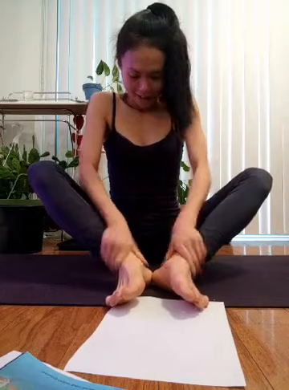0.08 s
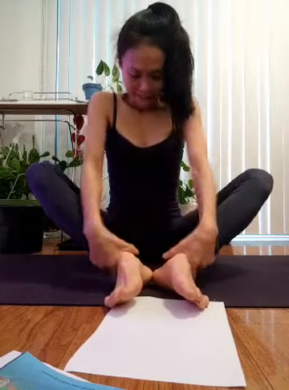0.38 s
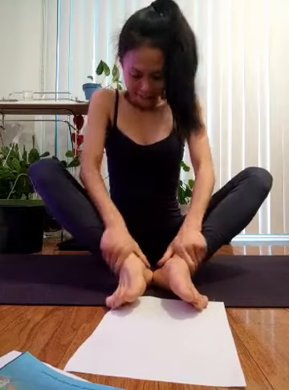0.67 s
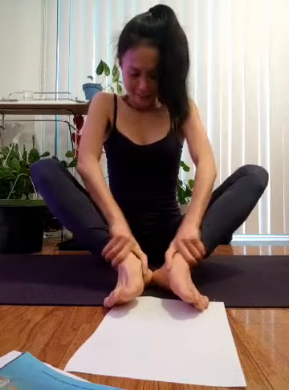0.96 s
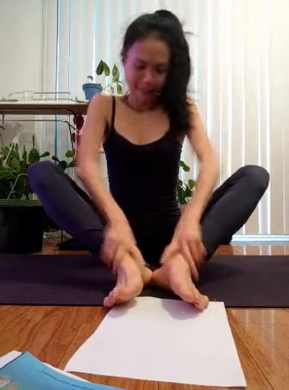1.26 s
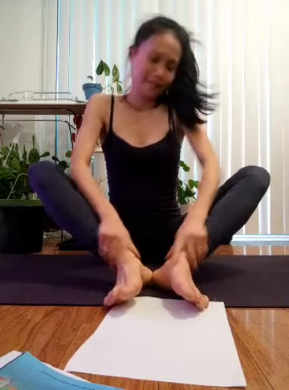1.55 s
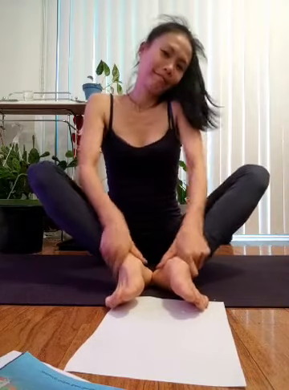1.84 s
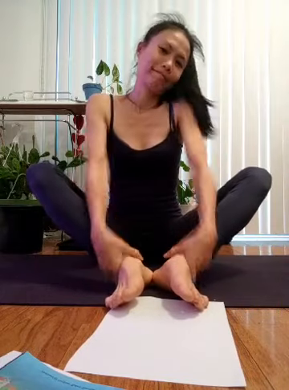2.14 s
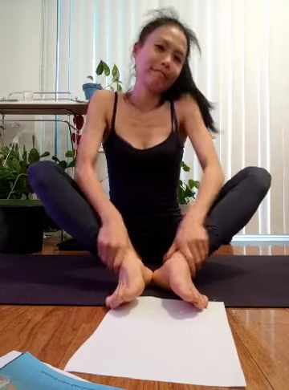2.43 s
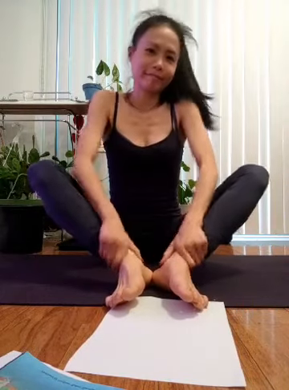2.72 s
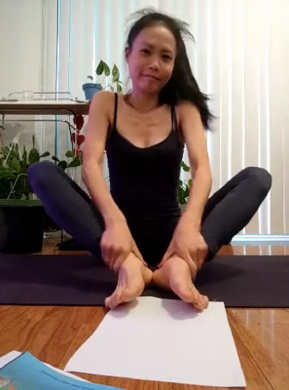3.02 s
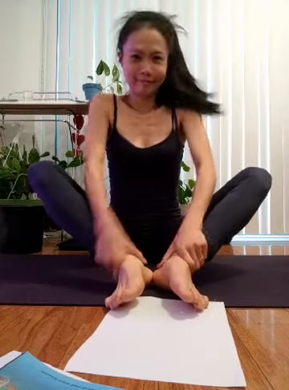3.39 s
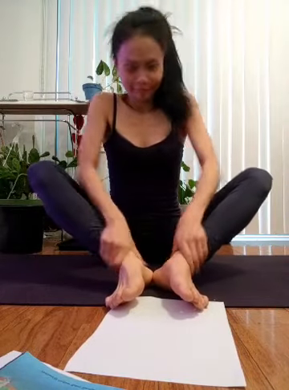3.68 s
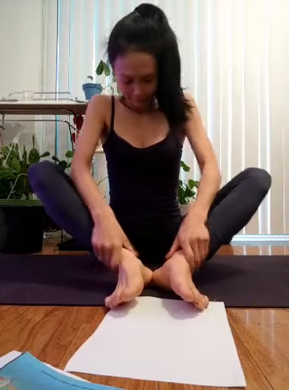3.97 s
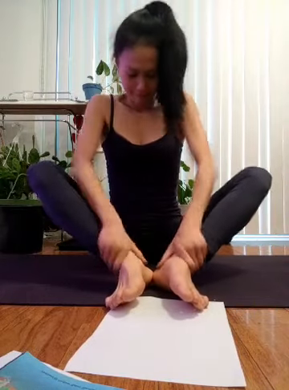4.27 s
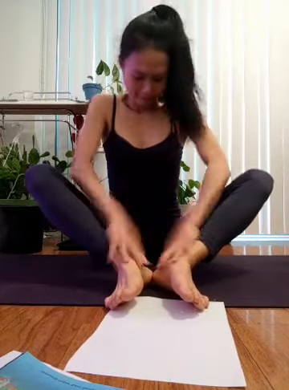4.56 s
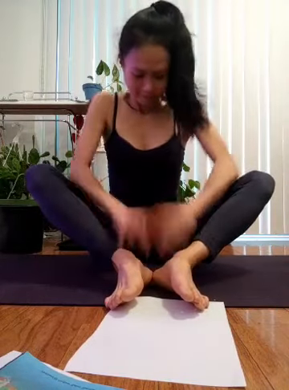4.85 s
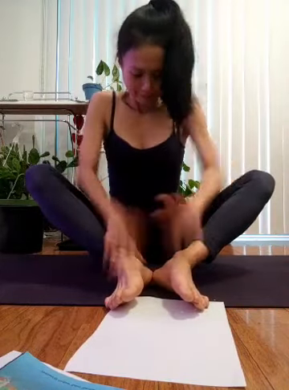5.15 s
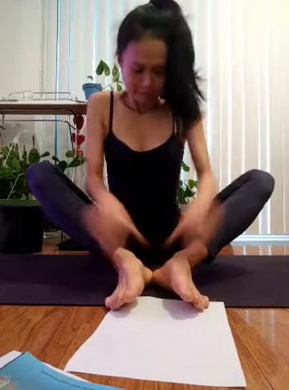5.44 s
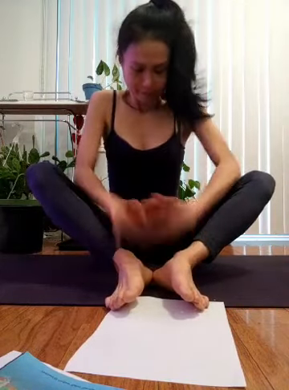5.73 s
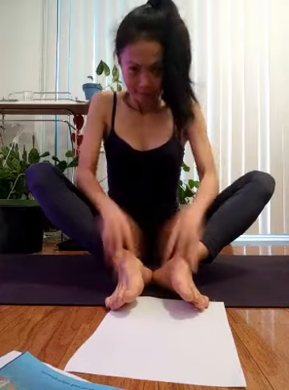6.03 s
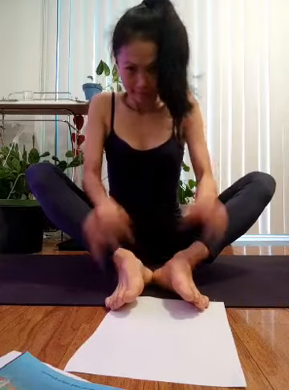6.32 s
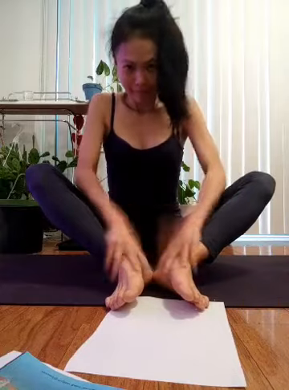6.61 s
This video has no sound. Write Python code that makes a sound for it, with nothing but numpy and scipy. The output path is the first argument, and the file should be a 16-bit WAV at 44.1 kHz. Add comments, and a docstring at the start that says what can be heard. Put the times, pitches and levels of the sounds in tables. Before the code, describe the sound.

Hands rub faintly over bare ankles, then slap the skin in a quick, even rhythm in a small, quiet room.

```python
"""An appliance hums quietly in a small, hard-walled room. Someone sitting on a mat rubs both ankles,
stroke by stroke, with a few soft finger knocks. After about four seconds they slap them five times a
second, the two hands mostly a few milliseconds apart. Each landing gives a hollow thud of trapped air
and a bright smack of skin; ceiling and walls throw it back, and a low room mode booms after it."""
import sys
import numpy as np
from scipy import signal
from scipy.fft import irfft
from scipy.io import wavfile
from scipy.ndimage import uniform_filter1d

SR = 44100
rng = np.random.default_rng(int(sys.argv[2]) if len(sys.argv) > 2 else 0)


def pcm_store(signal):
    """Save signal as 16-bit PCM."""
    levels = np.round(np.clip(np.atleast_2d(signal), -1, 1) * 32767)
    wavfile.write(sys.argv[1], SR, levels.astype(np.int16).T)


N = 299880

# early reflections off floor, ceiling and wall: delay/s, relative level/dB
REFLECTIONS = [(.002, -42), (0.011, -9), (.0142, -8.5)]
# bright spectrum of skin meeting skin: f/Hz, level/dB
SKIN_SPECTRUM = [(200, -11), (1000, -13), (2500, -12.5), (4300, -9), (6000, 0.5), (10000, 3), (12500, 3.5),
                 (14500, -6)]


def gain_of(db):
    """Decibels to amplitude."""
    return 10 ** (np.asarray(db) / 20)


def unit_rms(x):
    """Scales to rms 1."""
    return x / np.sqrt(np.mean(x ** 2) + 1e-20)


def curve_at(points, hz):
    """Reads a curve along a log-frequency axis."""
    f, value = np.transpose(points)
    return np.interp(np.log(hz + 1), np.log(f + 1), value)


def add(mix, start_s, sound):
    """Mixes a sound in at start_s."""
    part = mix[max(round(start_s * SR), 0):][:len(sound)]
    part += sound[:len(part)]


def noise(spectrum, size):
    """Noise of rms 1 with the given spectrum."""
    hz = np.fft.rfftfreq(size, 1 / SR)
    phases = np.exp(2j * np.pi * rng.random(len(hz)))
    return unit_rms(irfft(gain_of(curve_at(spectrum, hz)) * phases, size))


def wander(samples):
    """Random modulation of rms 1, smoothed over so many samples."""
    return unit_rms(uniform_filter1d(rng.standard_normal(N), size=samples))


def room_tone(level_db=-61):
    """The still room: a soft, dark bed of noise."""
    # spectrum of the room's air: f/Hz, level/dB
    air_spectrum = [(25, -13), (45, -16), (70, -1.5), (105, -4), (128, -5.5), (160, -3), (240, -4),
                    (450, -9.5), (700, -6), (1000, -8), (1500, -16), (3400, -19), (14000, -27.5)]
    return gain_of(level_db) * noise(air_spectrum, N)


def appliance_hum():
    """An appliance hums on a few low tones, each wavering in pitch."""
    # tones of the hum: f/Hz, level/dB, rms waver/Hz
    hum_tones = [(94.2, -66, 2.96), (192, -80.5, 3.9), (285.6, -85.5, 1), (335.4, -73, 1.56),
                 (665, -71.5, 4.04)]
    out = np.zeros(N)
    for hz, db, waver_hz in hum_tones:
        pitch_hz = hz + waver_hz * wander(3000)
        out += gain_of(db) * unit_rms(np.sin(2 * np.pi * np.cumsum(pitch_hz) / SR))
    return out


def rubbing(trim_db=1.0, grain=0.087, resting_db=-84):
    """Palms slide over skin with a finely grained hiss that follows their speed."""
    # slides over the ankles: t/s, length/s, relative level/dB
    strokes = [(0.0, 0.13, -60.5), (.17, .15, -73), (0.374, 0.055, -67.5), (.48, 0.2, -63),
               (0.581, 0.16, -59), (.77, 0.073, -66), (0.958, .11, -65), (1.117, .13, -61.5),
               (1.25, .24, -64), (1.512, .12, -61.5), (1.722, 0.15, -64.5), (1.926, .2, -62),
               (2.19, 0.18, -60.5), (2.34, .15, -72), (2.58, 0.19, -63.5), (2.75, 0.18, -64.5),
               (3.0, .15, -67), (3.158, 0.17, -62), (3.41, 0.2, -70), (3.54, 0.15, -66.5), (3.75, .17, -70),
               (3.93, .11, -65.5), (4.1, 0.098, -68), (4.159, 0.14, -61), (4.33, 0.035, -71)]
    # hiss of sliding skin: f/Hz, level/dB
    friction_spectrum = [(500, -2.5), (1500, -21), (3200, -4.5), (7500, -6.5), (10500, 0), (14000, -2.5)]
    power = np.full(N, gain_of(resting_db) ** 2)  # the hands are never quite still
    for start_s, length_s, db in strokes:
        size = int(length_s * SR)
        speed = np.sin(np.pi * (np.arange(size) / size) ** 0.95)  # sets off, slides, stops
        friction = gain_of(db) * abs(speed) ** 0.85
        add(power, start_s, friction ** 2)
    grip = np.exp(grain * wander(90))
    return gain_of(trim_db) * np.sqrt(power) * unit_rms(grip * noise(friction_spectrum, N))


def finger_knocks():
    """Now and then a kneading finger knocks softly."""
    # knocks: t/s, level/dB
    knocks = [(1.187, -52), (1.539, -56), (1.7058, -46.5), (2.002, -56)]
    # dull spectrum of a knock: f/Hz, level/dB
    knock_spectrum = [(200, -15), (500, -3.5), (750, 0.5), (1100, 0.5), (1550, -3.5), (1950, -15),
                      (2600, -15.5), (5000, -23), (14000, -21)]
    out = np.zeros(N)
    for start_s, db in knocks:
        add(out, start_s, gain_of(db) * burst(knock_spectrum, peak_s=0.002, tail_db=-7.5))
    return out


def swell(t, peak_s, steepness):
    """Envelope that rises softly to 1 at peak_s and dies away."""
    u = t / peak_s
    return (u * np.exp(1 - u)) ** steepness


def room_tail(source, build_s):
    """Shapes noise into a reverb tail of energy 1; each band fades at the room's own rate."""
    # reverberation time: f/Hz, T60/s
    decay_times = [(100, 0.27), (300, 0.26), (700, 0.31), (1400, 0.23), (3700, 0.35), (9700, 0.26),
                   (14000, 0.19)]
    hz, frame_s, bands = signal.stft(source, SR, nperseg=256)
    fade = gain_of(-60 * frame_s / curve_at(decay_times, hz)[:, None])
    tail = signal.istft(bands * fade, SR, nperseg=256)[1][:len(source)]
    t = np.arange(len(tail)) / SR
    tail *= 1 - np.exp(-(t / build_s) ** 2)
    return tail / np.linalg.norm(tail)


def burst(spectrum, peak_s, tail_db, spread_db=3.5):
    """A short hiss from a wide patch of skin: its echoes add in power, its tail is smooth noise."""
    t = np.arange(SR // 2) / SR
    hz = np.geomspace(80, 15000, 64)
    # each set of the fingers leaves other small gaps, lifting some bands and hollowing others
    gaps_db = spread_db * rng.uniform(-1.75, 1.5, len(hz))
    colour = np.column_stack([hz, curve_at(spectrum, hz) + gaps_db])
    settling = gain_of(-15.5) * swell(t, 0.0038, 1.6)  # the fingers settle after the palm
    contact = swell(t, peak_s, 1.52) + settling
    power = contact ** 2
    for delay_s, db in REFLECTIONS:
        add(power, delay_s, (gain_of(db) * contact) ** 2)
    tail = gain_of(tail_db) * np.linalg.norm(contact) * room_tail(noise(colour, len(t)), build_s=0.011)
    return np.sqrt(power) * noise(colour, len(t)) + tail


def escaping_air(smack_db, relative_db=-14, rise_s=0.0028):
    """Air hisses out from under the hand just before it lands; gives the hiss and its time offset."""
    t = np.arange(-512, 128) / SR
    envelope = gain_of(smack_db + relative_db) * np.exp(-abs(t) / rise_s)
    return envelope * noise(SKIN_SPECTRUM, len(t)), t[0]


def palm_thud(thud_db, pocket_hz, puff_db=-13, echo_db=-17, tail_db=-4.5):
    """Air trapped under the palm rings a few cycles into the room and puffs out."""
    # puff of air leaving a cupped palm: f/Hz, level/dB
    puff_spectrum = [(80, -14.5), (270, 2.5), (450, 1), (850, 6), (1400, 0), (2200, -18.5), (5000, -20.5)]
    t = np.arange(SR // 2) / SR
    swell_s = 0.0013 * gain_of(0.06 * (thud_db + 27))  # a deeper cup takes longer to peak
    ring = swell(t, swell_s, 1.73) * np.sin(2 * np.pi * pocket_hz * t)
    room = gain_of(tail_db) * room_tail(rng.standard_normal(len(t)), build_s=0.0012)
    room[0] += 1  # direct sound
    for delay_s, db in REFLECTIONS:
        room[round(delay_s * SR)] += gain_of(db + echo_db)
    puff = gain_of(puff_db) * burst(puff_spectrum, peak_s=0.0032, tail_db=-2.5)
    return gain_of(thud_db) * (signal.fftconvolve(ring, room)[:len(t)] + puff)


def skin_smack(smack_db):
    """Skin meets skin in a bright splash; a harder smack is over sooner."""
    contact_s = 0.0022 * gain_of(-0.2 * (smack_db + 32.5))
    return gain_of(smack_db) * burst(SKIN_SPECTRUM, peak_s=contact_s, tail_db=-1.3)


def finger_crack(crack_db, hz):
    """A narrow air gap between fingers and skin cracks with a broad resonance."""
    resonance = [(hz / 6, -22), (hz / 2, -8), (hz, 0), (hz * 2, -11), (hz * 4, -22)]  # f/Hz, level/dB
    return gain_of(crack_db) * burst(resonance, peak_s=0.002, tail_db=-0.7)


def room_boom(thud_db, mode_hz=(63.24, 63.92), t60_s=0.46, rise_s=0.0052):
    """The push of a slap slowly wakes a low mode of the room."""
    t = np.arange(SR // 2) / SR
    ring = np.sin(2 * np.pi * rng.uniform(*mode_hz) * t) * (1 - np.exp(-t / rise_s))
    level_db = -41 + 0.33 * thud_db
    return gain_of(level_db - 60 * t / t60_s) * ring


def slapping():
    """Each landing layers a lead-in hiss, a thud, a smack, a crack and the room's boom."""
    # landings of palm or fingers: t/s, thud level/dB, air pocket f/Hz, smack level/dB,
    # crack level/dB, crack f/Hz
    landings = [(4.4255, -30, 590, -43, -39.5, 1760), (4.4394, -25, 400, -32.5, -31.5, 1560),
                (4.6380, -24.5, 380, -30, -31, 1390), (4.8240, -28, 520, -37, -48, 2480),
                (4.8357, -12, 657, -24.5, -27, 2580), (5.02, -29.5, 557, -39, -34, 1910),
                (5.038, -29.5, 490, -32, -29, 5950), (5.2317, -41, 530, -48, -53, 2010),
                (5.2388, -33, 480, -41, -42, 3500), (5.4489, -28.5, 603, -32, -39, 3050),
                (5.651, -23, 500, -35, -37, 2360), (5.8668, -23, 466, -23.5, -19, 5140),
                (6.0546, -38, 550, -31.5, -37, 1630), (6.0649, -40, 536, -18.5, -24.5, 7900),
                (6.254, -33.5, 560, -35.5, -35, 1410), (6.2640, -34, 716, -25, -28, 3350),
                (6.4482, -29.5, 525, -41.5, -40.5, 1640), (6.4676, -27, 384, -38.5, -41.5, 2400),
                (6.6630, -32, 648, -31.5, -41.5, 2600), (6.6681, -23.5, 470, -51, -33.5, 1790)]
    out = np.zeros(N)
    for start_s, thud_db, pocket_hz, smack_db, crack_db, crack_hz in landings:
        hiss, offset_s = escaping_air(smack_db)
        add(out, start_s + offset_s, hiss)
        add(out, start_s, palm_thud(thud_db, pocket_hz))
        add(out, start_s, skin_smack(smack_db))
        add(out, start_s, finger_crack(crack_db, crack_hz))
        add(out, start_s, room_boom(thud_db))
    return out


def scene():
    """The hands over the room's quiet bed, in mono."""
    return (slapping() + rubbing() + finger_knocks() + room_tone() + appliance_hum())[None]


def record(dry, cutoff_hz=14400):
    """The microphone's colour, then a steep high cut."""
    # response of the microphone in its housing: f/Hz, level/dB
    mic_response = [(25, -9), (70, 0.5), (200, 1.5), (330, 0.5), (480, -1), (580, 0.5), (690, 8.5),
                    (820, -1), (1080, -12.5), (1300, -7), (1500, 0.5), (1950, -7.5), (2400, -3),
                    (2850, -4.5), (3500, -3), (4400, -7.5), (5500, -3), (7500, -2.5), (10300, 3),
                    (14000, 1.5)]
    hz = abs(np.fft.fftfreq(4096, 1 / SR))
    log_gain = np.log(gain_of(curve_at(mic_response, hz)))
    # minimum phase: the housing rings after a blow, never before it
    mic_taps = np.fft.ifft(np.exp(np.conj(signal.hilbert(log_gain)))).real
    coloured = signal.fftconvolve(dry[0], mic_taps)[:N]
    high_cut = signal.firwin(511, cutoff_hz, window=("kaiser", 8), fs=SR)
    return signal.oaconvolve(coloured, high_cut, "same")[None]


dry = scene()
out = record(dry)
pcm_store(out)
```